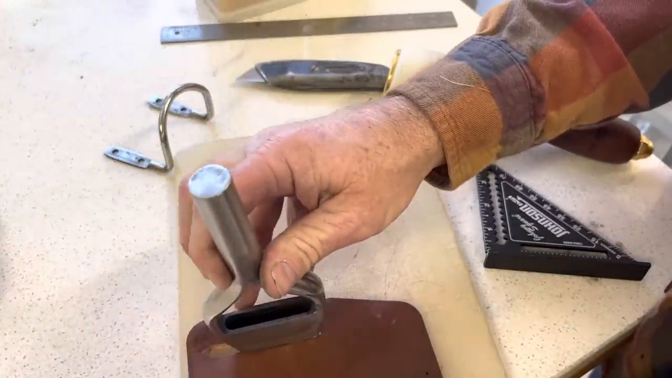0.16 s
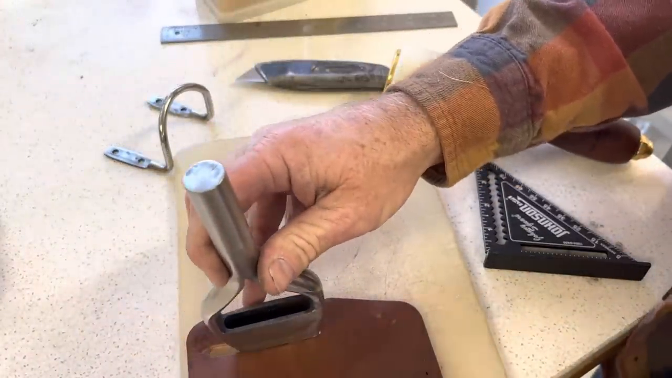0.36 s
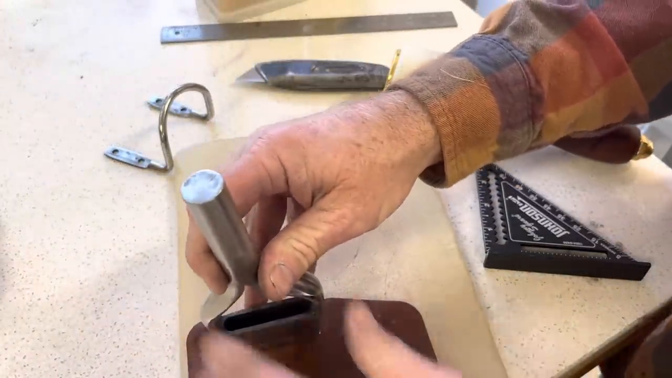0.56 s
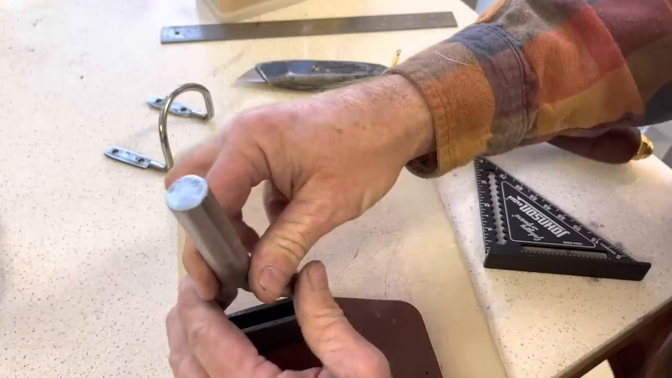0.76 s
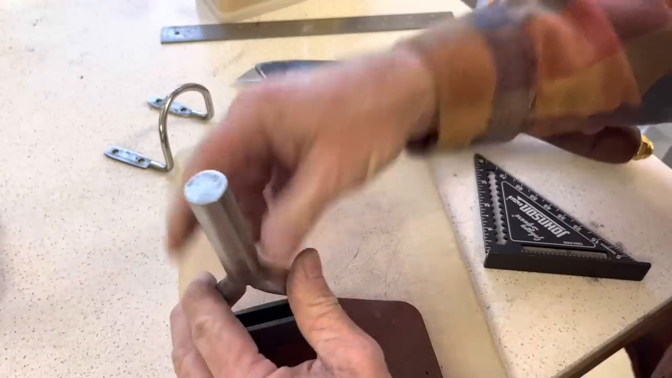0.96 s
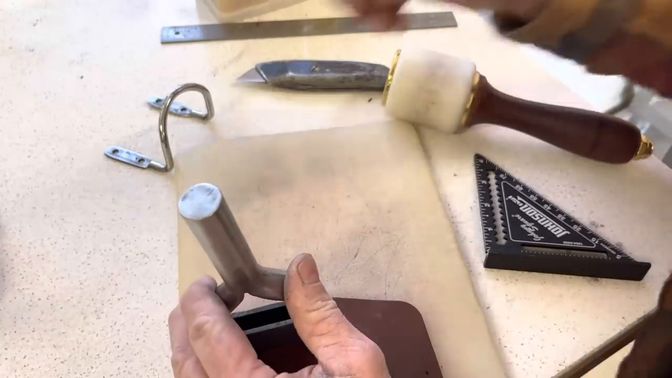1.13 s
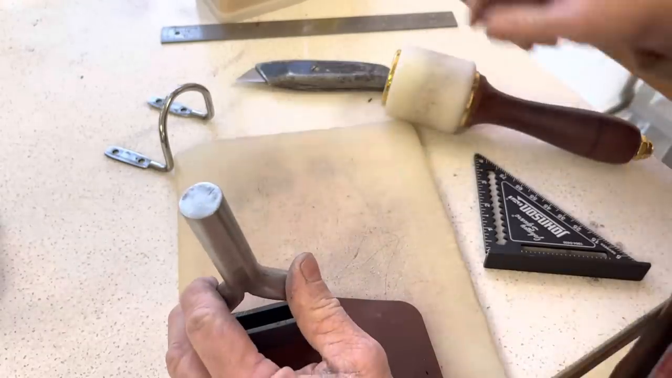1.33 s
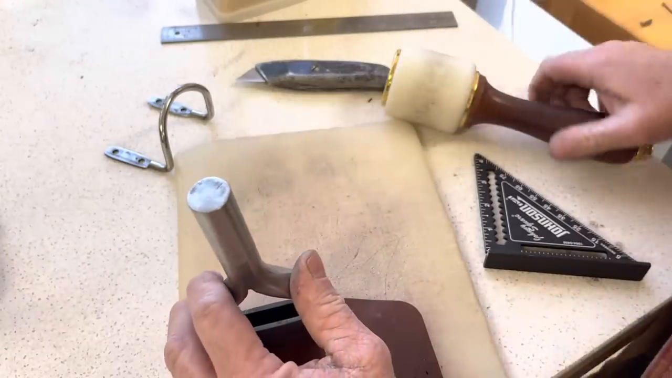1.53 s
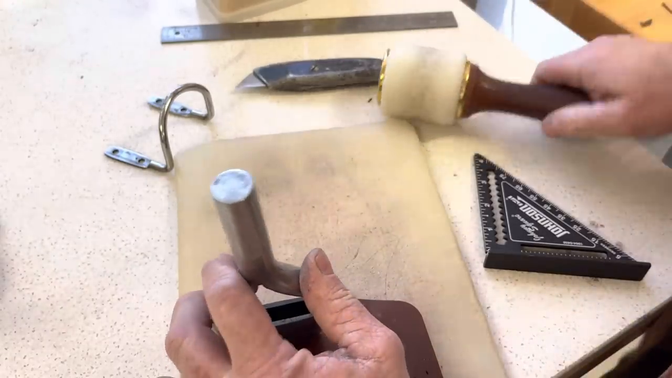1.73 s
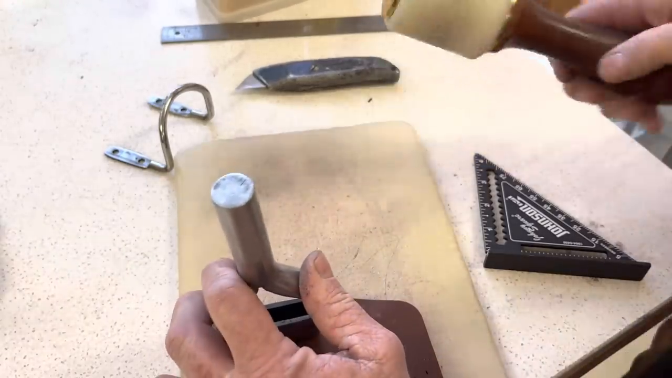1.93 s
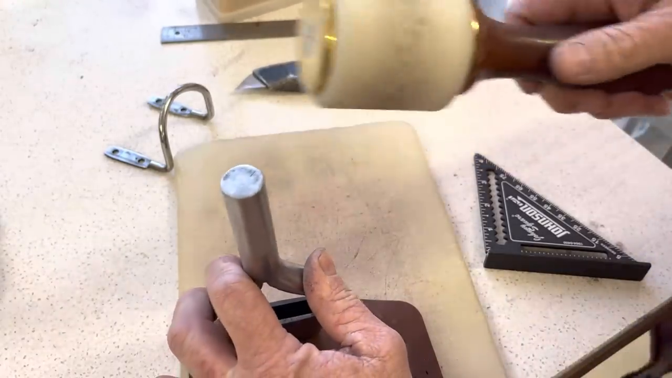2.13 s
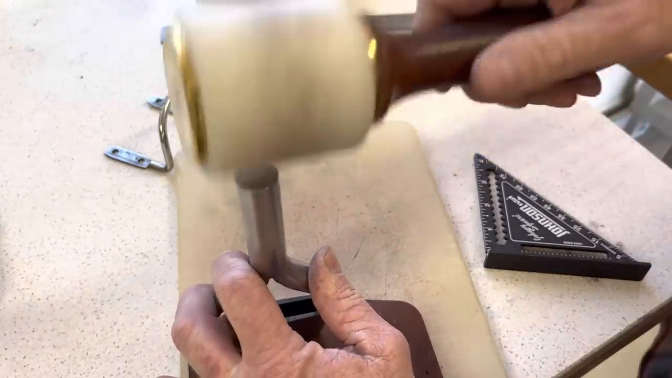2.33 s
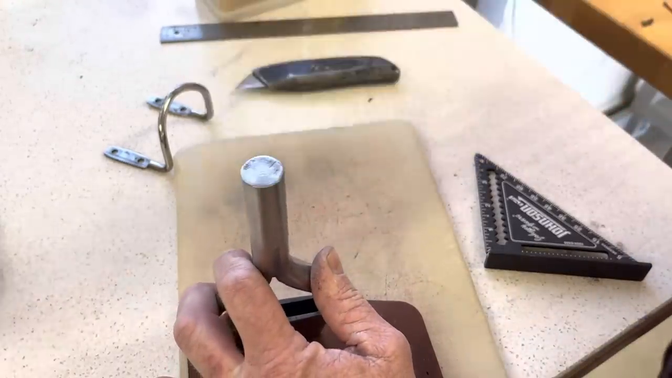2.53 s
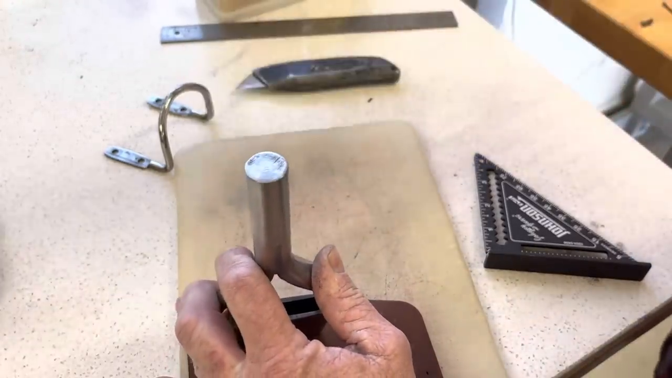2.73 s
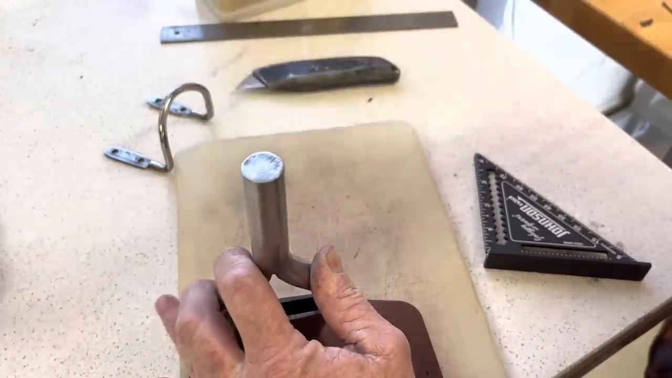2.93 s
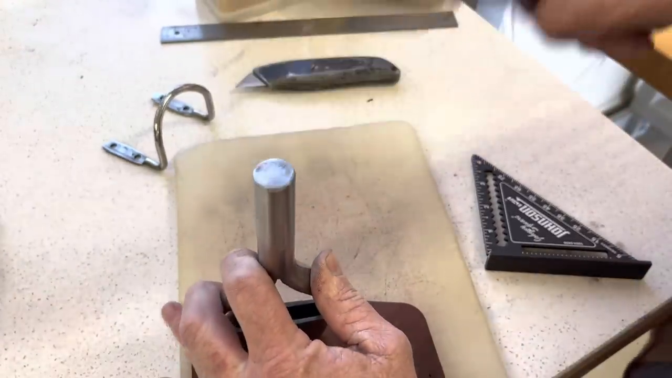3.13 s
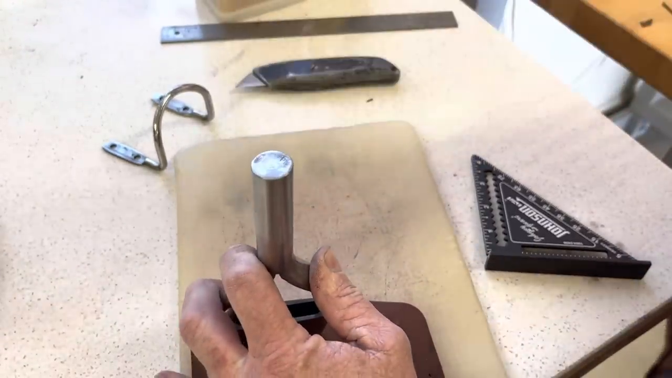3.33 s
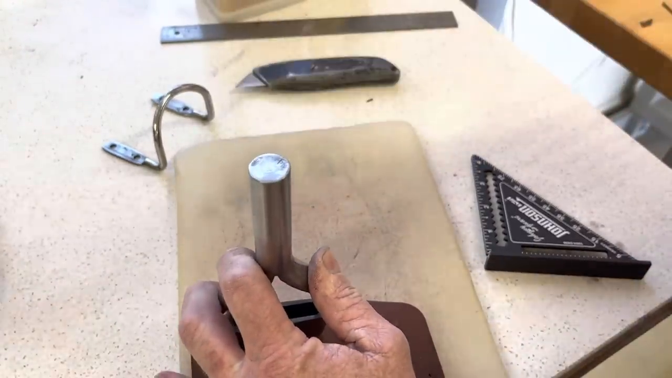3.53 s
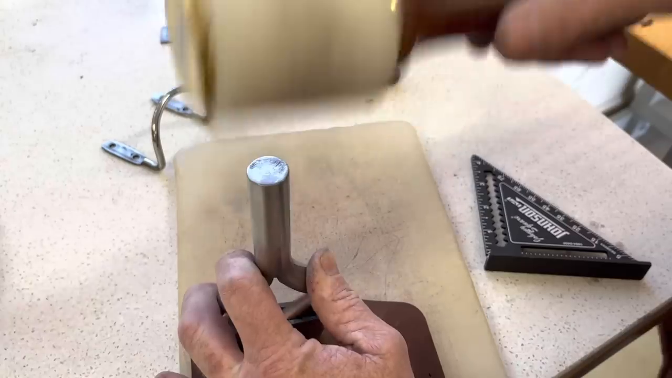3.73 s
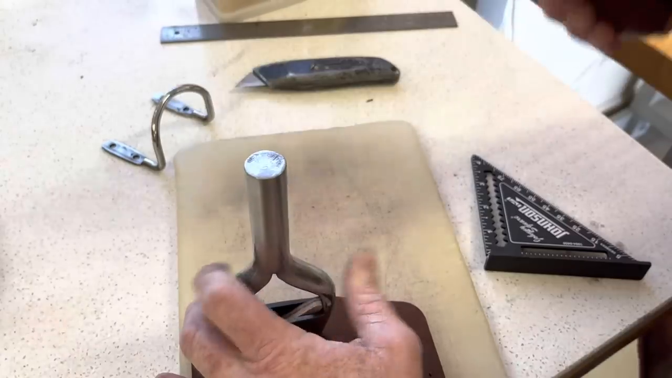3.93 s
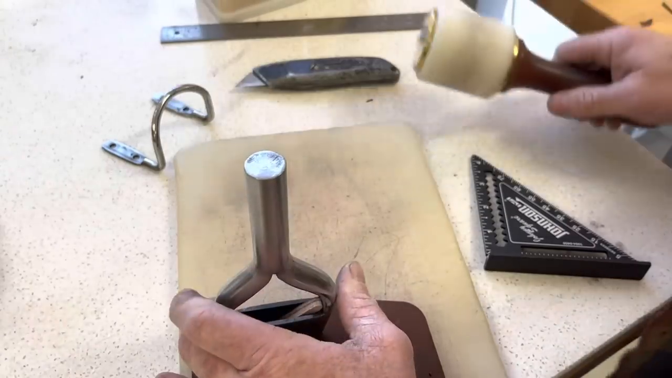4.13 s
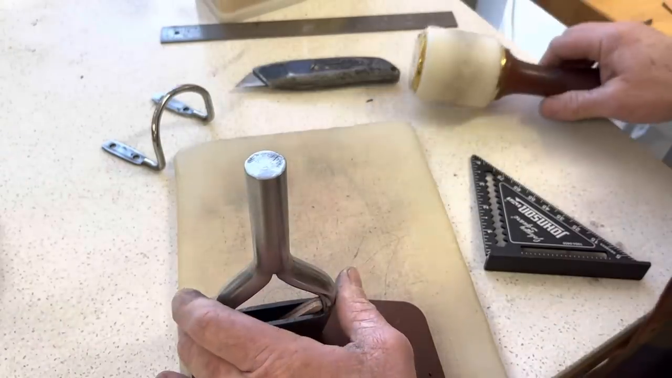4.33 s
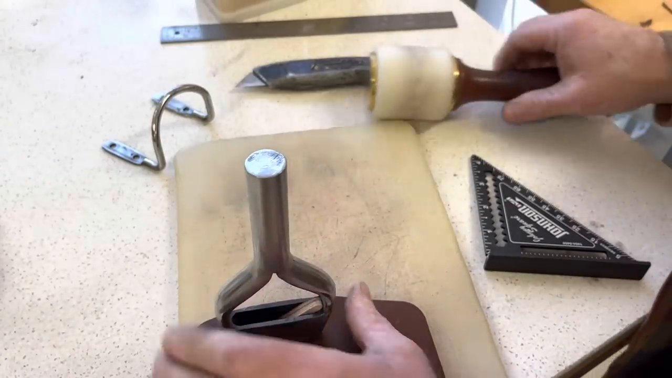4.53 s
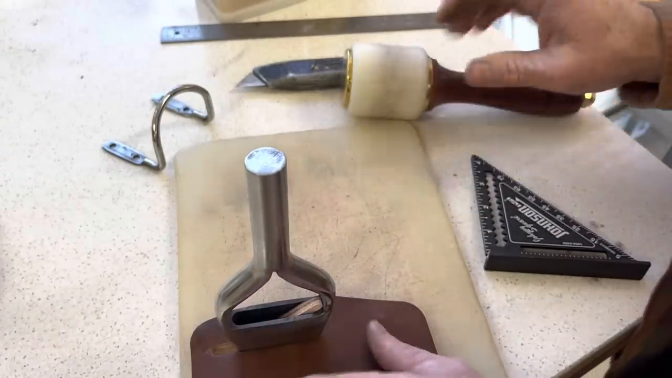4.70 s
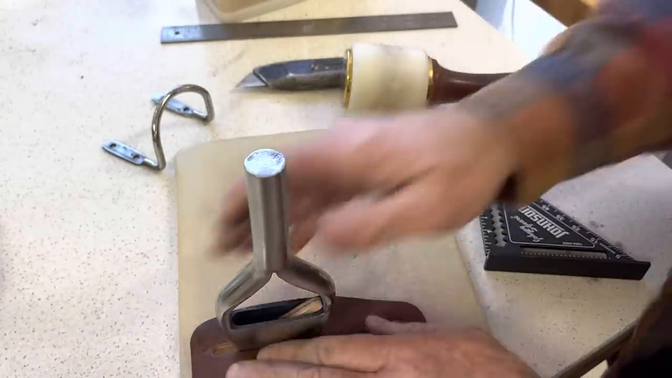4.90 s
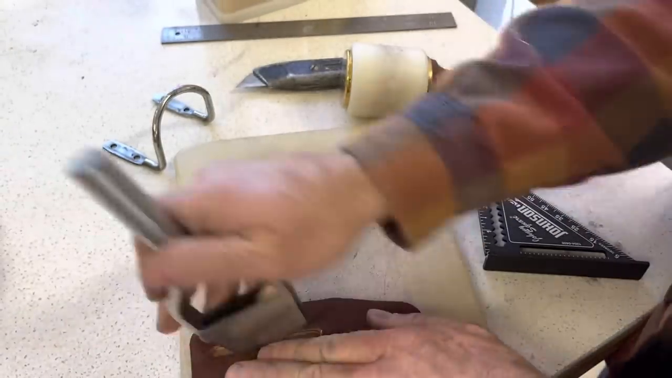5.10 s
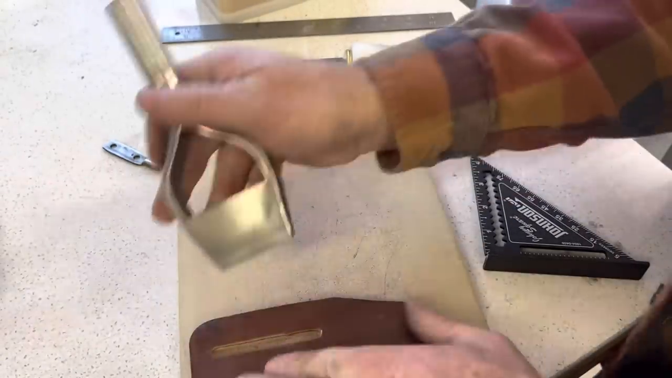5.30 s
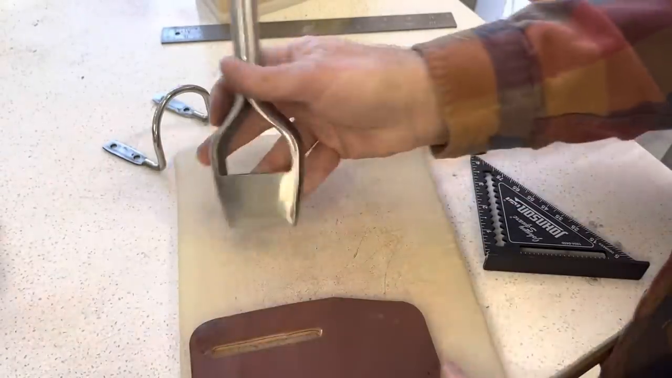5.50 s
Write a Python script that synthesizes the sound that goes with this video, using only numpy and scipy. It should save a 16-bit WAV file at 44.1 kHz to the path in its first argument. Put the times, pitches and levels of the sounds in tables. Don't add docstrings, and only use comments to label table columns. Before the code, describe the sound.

Close stereo pickup at a leather workbench. Faint low hum, sleeve rustle and small wooden knocks as a mallet is picked up. One firm tap on a steel punch, then two very loud, distorted blows about two thirds of a second apart, with bench thud, rattling steel and short room echo. The recorder ducks; the mallet is laid down with light knocks, then cloth rustles.

```python
import sys
import numpy as np
from scipy import signal
from scipy.fft import irfft, next_fast_len
from scipy.io import wavfile

SR = 44100
rng = np.random.default_rng(int(sys.argv[2]) if len(sys.argv) > 2 else 0)


def materialize(psi):
    bounded = np.clip(np.atleast_2d(psi).T, -1, 1)
    quanta = np.round(bounded * 32767).astype(np.int16)
    wavfile.write(sys.argv[1], SR, quanta)


def invert_db(x):
    u = np.asarray(x, float) / 20
    return 10 ** u


N = 245195


def unit(x):
    return x / np.sqrt(np.mean(x ** 2) + 1e-20)


def at_hz(points, hz):
    table_hz, value = np.transpose(points)
    return np.interp(np.log(hz), np.log(table_hz), value)


def band(x, low_hz, high_hz, order=2):
    return signal.sosfilt(signal.butter(order, [low_hz, high_hz], "band", fs=SR, output="sos"), x)


def ring(clicks, hz, t60):
    r, w = invert_db(-60 / (t60 * SR)), 2 * np.pi * hz / SR
    return signal.lfilter([0, np.sin(w)], [1, -2 * r * np.cos(w), r * r], clicks + 1e-18)


def add(out, sound, s):
    i = round(s * SR)
    out[:, i:i + sound.shape[1]] += sound[:, :N - i]


def swell(s, level_db, rise_s, t60):
    out, i = np.zeros(N), round(s * SR)
    t = np.arange(min(N - i, int((rise_s + 2 * t60) * SR))) / SR
    fall_db = 60 * np.maximum(t - rise_s, 0) / t60
    out[i:i + len(t)] = np.minimum(t / rise_s, 1) * invert_db(level_db - fall_db)
    return out


def together(envelopes):
    return np.sqrt(sum(e ** 2 for e in envelopes))


# f/Hz, likeness [-1 to 1]
LIKENESS = [(60, 1), (130, 0.92), (290, 0.97), (640, -0.18), (1410, -0.12), (3100, 0.59), (6820, -0.5),
            (15000, 1)]


def coloured(spectrum, from_hz, to_hz):
    size = next_fast_len(N)
    hz = np.maximum(np.arange(size // 2 + 1) * SR / size, 1)
    white = rng.standard_normal((2, len(hz))) + 1j * rng.standard_normal((2, len(hz)))
    mid, side = white * invert_db(at_hz(spectrum, hz))
    alike = np.clip(at_hz(LIKENESS, hz), -1, 1)
    both = np.sqrt(1 + alike) * mid + np.sqrt(1 - alike) * side * [[1], [-1]]
    inside = (hz > from_hz) & (hz < to_hz)
    power = np.sum(abs(both.mean(axis=0)[inside]) ** 2) * 2 / size ** 2
    return irfft(both, size)[:, :N] / np.sqrt(power)


# t/s, level/dB
GAIN = [(0.0, -0.5), (2.3, 0), (2.42, 4), (2.953, 0.5), (2.962, -24), (3.14, -19), (3.33, 1), (3.615, 2),
        (3.625, -20), (4.15, -20), (4.4, -17.5), (5.56, -18.5)]


def gain_control():
    return invert_db(np.interp(np.arange(N) / SR, *np.transpose(GAIN)))


# f/Hz, level/dB per Hz
AIR = [(15, -33.5), (25, -19), (55, -2), (87, -2.5), (166, -6), (195, -11), (236, -7.5), (354, -8.5),
       (863, -22.5), (1890, -28.5), (4490, -51.5), (6740, -52.5), (8140, -69), (11600, -50), (16000, -79.5)]
# t/s, level/dB, rise/s, t60/s, drone over air/dB
RUMBLE = [
    (2.36, -43, 0.05, 1.5, -17),
    (3.38, -54.5, 0.12, 0.97, 10),
    (3.63, -50, 0.2, 0.35, 4),
    (4.15, -75, 0.33, 1.1, 15),
]


def hum():
    steady = invert_db(-51.5) * gain_control()
    air = together([steady] + [swell(*row[:4]) for row in RUMBLE])
    low = [swell(s, db + drone_db, rise, t60) for s, db, rise, t60, drone_db in RUMBLE]
    low = together([steady] + low)
    drone = unit(ring(rng.standard_normal(N), 57, 0.86))
    return air * invert_db(-4.0) * coloured(AIR, 40, 300) + low * invert_db(-4.5) * drone


# t/s, level/dB, rise/s, t60/s, lower treble over upper/dB
RUSTLE = [(0.0, -83, 0.0049, 1.9, 12), (0.4, -75, 0.11, 4.8, 5), (0.62, -69, 0.055, 0.25, 6),
          (0.761, -89, 0.044, 0.55, -16), (0.9, -101, 0.013, 0.12, -13.5), (0.94, -90, 0.011, 2.3, 7),
          (1.39, -89, 0.04, 0.27, 30), (1.47, -77.5, 0.028, 3.1, 5), (1.83, -76, 0.018, 2.7, 2),
          (1.88, -66, 0.14, 0.047, 0.5), (2.25, -87, 0.023, 0.51, 9), (2.611, -62, 0.006, 0.019, -18),
          (2.62, -77, 0.004, 0.73, 5.5), (2.814, -81.5, 0.028, 1.8, 4), (4.7, -76, 0.16, 1.5, 12),
          (4.96, -59, 0.037, 0.41, 4.5), (5.1, -69.5, 0.024, 0.3, 4), (5.18, -67, 0.049, 1.9, 0)]


def rustle():
    cloth_db, cloth_lower_db = -96, 15
    upper = together([invert_db(cloth_db)] + [swell(*row[:4]) for row in RUSTLE])
    lower = [swell(s, db + lower_db, rise, t60) for s, db, rise, t60, lower_db in RUSTLE]
    lower = together([invert_db(cloth_db + cloth_lower_db)] + lower)
    white = rng.standard_normal((3, N))
    white = 0.27 * white[0] + 1.7 * white[1:]
    upper_hiss = unit(band(white, 9200, 13500, order=4))
    lower_hiss = unit(band(white, 1600, 5300))
    return gain_control() * (upper * upper_hiss + lower * invert_db(-1.0) * lower_hiss)


def tail(gain, treble_gain, colour, level_range_hz, lines=()):
    noise = coloured(colour, *level_range_hz)
    body = signal.sosfilt(signal.butter(2, 2300, fs=SR, output="sos"), noise)
    treble = unit(band(noise, 2300, 11000, order=3))
    for hz, level_db in lines:
        treble += invert_db(level_db + 9) * unit(ring(noise[0], hz, 0.25))
    return gain * body + invert_db(3.0) * treble_gain * treble


# t/s, level/dB, treble/dB, slow part/dB
WOOD_TAIL = [(1.215, -62.5, 4, -12.5), (1.633, -54.5, -2.5, -5.5), (1.655, -44.5, -9.5, -20),
             (1.681, -38.5, -16, -31), (1.709, -27, -42, -14.5), (2.353, -21.5, -18, -14),
             (2.371, -22, -31, -28), (4.358, -38, -14.5, -18.5), (4.422, -47, -37, -8.5),
             (4.484, -49, -34, -10), (4.608, -41, -25, -14), (4.658, -55.5, -36, -10.5)]
# f/Hz, level/dB per Hz
WOOD_COLOUR = [(35, -34.5), (60, -1.5), (106, -1.5), (156, -8.5), (460, -3), (552, -14), (664, -7),
               (1080, -22), (1270, -25), (5300, -48), (7800, -57.5), (10100, -84), (17200, -120)]


def wood_tail():
    rise_s, quick_t60_s, slow_t60_s, slow_treble_db = 0.001, 0.1, 0.72, 3.5
    body, treble = [], []
    for s, db, treble_db, slow_db in WOOD_TAIL:
        quick = swell(s, db, rise_s, quick_t60_s)
        slow = swell(s, db + slow_db, rise_s, slow_t60_s)
        body += [quick, slow]
        treble += [invert_db(treble_db) * quick, invert_db(treble_db + slow_treble_db) * slow]
    return tail(together(body), together(treble), WOOD_COLOUR, (250, 1000))


# t/s, level/dB, treble/dB
ECHO = [
    (2.345, -46.5, -13),
    (2.962, -14.5, 1.5),
    (3.624, -15, -1.5),
]
# t/s, level/dB, treble/dB
REBOUNDS = [
    (2.341, -25.5, -31.5),
    (2.363, -33.5, -27.5),
    (3.027, -12.5, -1.5),
    (3.705, -9.5, -2),
]
# f/Hz, level/dB per Hz
ECHO_COLOUR = [(35, -34), (60, -7.5), (208, -4), (509, 2), (1170, 1), (2540, -9), (3250, -16.5),
               (3520, -15), (5520, -17.5), (6490, -22.5), (7800, -40), (10100, -75), (17200, -120)]
# f/Hz, level/dB
ECHO_LINES = [(1040, -22.5), (1660, -27.5), (3273, -23), (4010, -33.5), (4560, -26), (5090, -30.5),
              (5630, -28.5), (6335, -32)]


def echo():
    room_rise_s, room_t60_s, room_treble_t60_s = 0.012, 0.75, 0.68
    rebound_rise_s, rebound_t60_s = 0.0035, 0.066
    body, treble = [], []
    for s, db, treble_db in ECHO:
        body.append(swell(s, db, room_rise_s, room_t60_s))
        treble.append(swell(s, db + treble_db, room_rise_s, room_treble_t60_s))
    for s, db, treble_db in REBOUNDS:
        burst = swell(s, db, rebound_rise_s, rebound_t60_s)
        body.append(burst)
        treble.append(burst * invert_db(treble_db))
    return gain_control() * tail(together(body), together(treble), ECHO_COLOUR, (900, 2000), ECHO_LINES)


# t/s, peak level/dB, f/Hz
TICKS = [(0.921, -53.5, 2150), (1.2138, -43, 2080), (1.408, -59, 2560), (1.6395, -47.5, 4000),
         (2.616, -71, 3200), (4.95, -55.5, 2100), (4.999, -62, 3250), (5.1191, -68, 4500)]


def ticks():
    out, t = np.zeros((2, N)), np.arange(SR // 8) / SR
    for s, peak_db, hz in TICKS:
        grains = rng.standard_normal((2, len(t))) * (0.43 + 3.4 * (rng.random(len(t)) < 0.04))
        grains *= invert_db(-60 * t / 0.14)
        add(out, invert_db(peak_db - 3.5) * (band(grains, 760, 6700) + invert_db(-22.5) * ring(grains, hz, 0.013)), s)
    return out


# t/s, peak level/dB, slap f/Hz, board f/Hz, board level/dB
KNOCKS = [(1.221, -57.5, 2150, 800, 6), (1.682, -44, 513, 292, 10), (1.6912, -33.5, 2200, 503, -3),
          (1.7023, -22, 986, 410, 8), (2.3350, -8.5, 1045, 353, 5), (2.367, -31.5, 905, 330, 15),
          (3.006, -22, 1980, 485, -17.5), (3.027, -33, 1670, 500, -31), (3.7067, -19, 1900, 960, -2),
          (3.835, -40.5, 277, 121, 0), (4.3519, -32.5, 887, 318, -4), (4.417, -34.5, 918, 390, -5),
          (4.445, -59, 800, 398, -14), (4.477, -45, 787, 390, 9), (4.489, -53, 682, 330, 13),
          (4.603, -36.5, 830, 501, 3), (4.613, -42, 903, 400, -17), (4.656, -47.5, 596, 280, 8),
          (4.958, -60, 2007, 595, -22), (5.002, -57, 1205, 249.3, 0.5), (5.549, -61, 998, 501, -5)]
# f/Hz, level/dB, t60/s
BENCH = [(103.7, -17, 0.083), (150.6, -14.5, 0.21), (214, -17.5, 0.36), (275, -7.5, 0.045),
         (353, -10.5, 0.27), (469, -19, 0.033), (621.4, -7, 0.061), (714, -11.5, 0.19), (910, -12.5, 0.17),
         (998, -14, 0.21), (1317, -15, 0.06), (1665, -2.5, 0.055), (2183, -12.5, 0.05)]


def knocks():
    out, t = np.zeros((2, N)), np.arange(SR // 6) / SR
    tap_s = KNOCKS[4][0]
    for s, peak_db, slap_hz, board_hz, board_db in KNOCKS:
        bench = np.zeros((2, len(t)))
        for (hz, level_db, t60), luck in zip(BENCH, rng.standard_normal((len(BENCH), 2))):
            late = np.maximum(t - 1.2 / hz, 0)
            size = invert_db(level_db + 1.3 * luck[0] - 60 * late / t60) / (1 + (hz / slap_hz) ** 4)
            balance = invert_db(3.6 * luck[1] * np.array([[1], [-1]]))
            bench += balance * size * np.sin(2 * np.pi * hz * late)
        slap = np.sin(2 * np.pi * slap_hz * t) * np.sin(np.pi * np.minimum(t * slap_hz / 3.0, 1))
        swings = (t - 0.0035) * board_hz
        board = np.sin(2 * np.pi * swings) * np.sin(np.pi * np.clip(swings / 2.4, 0, 1)) ** 0.52
        puff_db = -16 + 3 * np.log2(slap_hz / 1000) + 15 * (s == tap_s)
        puff = band(rng.standard_normal((2, len(t))), 500, min(3 * slap_hz, 7000)) * invert_db(-60 * t / 0.096)
        knock = 0.5 * bench + 0.95 * slap + 0.81 * invert_db(board_db) * board + invert_db(puff_db) * puff
        add(out, invert_db(peak_db) * knock, s)
    return out


def jolt(s, drive_db, rise_s, t60, lasts_s):
    over = np.maximum(np.arange(N) / SR - s - lasts_s, 0)
    settle_t60_s = 0.04
    return swell(s, drive_db, rise_s, t60) * invert_db(-60 * np.minimum(over, 1) / settle_t60_s)


PORT_LAG = 7
# t/s, drive level/dB, rise/s, t60/s, lasts/s
RATTLE = [(2.339, -31, 0.0053, 0.048, 0.06), (2.37, -63.5, 0.011, 0.45, 0.099),
          (2.964, -34.5, 0.015, 0.79, 0.093), (3.021, -24.5, 0.0094, 0.28, 0.11),
          (3.627, -38, 0.0087, 0.64, 0.081), (3.64, -26, 0.061, 0.16, 0.13),
          (4.352, -42, 0.014, 0.16, 0.04), (4.419, -60.5, 0.006, 0.099, 0.026),
          (4.393, -76, 0.012, 0.81, 0.22), (4.601, -52.5, 0.011, 0.4, 0.033),
          (4.633, -78, 0.012, 0.6, 0.14)]
STEEL_HZ = [3274, 4010, 5090, 6335, 6650, 9800, 10035, 10800, 11238, 11850, 12410, 13033, 13182, 13490,
            14830, 15100, 9400, 2110, 5660]
STEEL_DB = [0, -5, -16.5, -4, -3.5, -6, -4, 1, -0.5, -4, -8.5, 1.5, -6, -1.5, -8.5, -6]


def rattle():
    drive = together(jolt(*row) for row in RATTLE)
    heights = invert_db(4.0 * np.minimum(rng.exponential(1, N), 4))
    sizes = unit(heights * rng.choice([-1, 1], N))
    dealt = rng.integers(0, 120, N)
    out = np.zeros((2, N))
    lucks = rng.standard_normal(len(STEEL_HZ))
    for k, (hz, level_db, luck) in enumerate(zip(STEEL_HZ, STEEL_DB, lucks)):
        strikes = invert_db(-14.0) * drive * sizes * (dealt == k)
        out += invert_db(level_db + 3.0 * luck * np.array([[1], [-1]])) * ring(strikes, hz, 0.05)
    white = rng.standard_normal((3, N))
    contacts = white[0] + 0.3 * sizes
    white = 0.4 * white[1:] + [np.roll(contacts, PORT_LAG), contacts]
    hiss = unit(band(white, 9600, 13600, order=3)) + invert_db(-4.5) * unit(band(white, 3300, 5600))
    return out + invert_db(-8) * drive * hiss


# t/s, level/dB, f/Hz
CLINKS = [(1.222, -48.5, 2110), (1.452, -57, 2110), (2.967, -44.5, 14830), (2.971, -37.5, 3274),
          (3.03, -53, 11850), (3.02, -30.5, 9800), (3.028, -28.5, 10800), (3.028, -24.5, 11238),
          (3.029, -26, 13033), (3.031, -30, 14830), (3.034, -27.5, 3274), (3.04, -32.5, 10035),
          (3.064, -32, 12410), (3.633, -29.5, 10800), (3.66, -36.5, 3274), (3.642, -35.5, 10035),
          (3.668, -42.5, 14830), (3.657, -31.5, 13490), (3.645, -41.5, 6650), (3.681, -31, 11238),
          (3.682, -28.5, 10800), (3.69, -29, 12410), (3.72, -66, 11850), (4.363, -53, 11238),
          (4.364, -52, 13033), (4.36, -44, 9400), (4.366, -65.5, 3274), (4.365, -64, 5660),
          (4.612, -69.5, 3274), (4.616, -71, 4010)]
STEEL_T60_S = [0.28, 0.35, 0.3, 0.2, 0.25, 0.8, 0.33, 0.09, 0.09, 0.8, 0.09, 0.07, 0.11, 0.14, 0.25, 0.2,
               0.2, 0.075, 0.45]


def clinks():
    laid_down_s, laid_down_damping = 4.2, 0.58
    out, t = np.zeros((2, N)), np.arange(SR * 3 // 5) / SR
    for (s, level_db, near_hz), luck in zip(CLINKS, rng.standard_normal((len(CLINKS), 64))):
        hz, t60 = min(zip(STEEL_HZ, STEEL_T60_S), key=lambda mode: abs(mode[0] - near_hz))
        if s > laid_down_s:
            t60 *= laid_down_damping
        lag = np.array([[0], [2 * np.pi * hz * PORT_LAG / SR * (hz > 6000) + 0.4 * luck[3]]])
        twin = 0.18 * np.sin(2 * np.pi * (hz + 30 * luck[0]) * t + luck[1] + lag)
        pair = np.sin(2 * np.pi * hz * t + lag) + twin
        flutter_db = 3.5 * np.interp(t * 95, np.arange(60), luck[4:])
        fade = np.minimum(t / 0.0011, 1) * np.maximum(1 - t / 1.0, 0) ** 0.5
        add(out, invert_db(level_db + flutter_db - 60 * t / t60) * fade * pair, s)
    return out


# t/s, level/dB
FAINT_SWELLS = [
    (2.336, -51),
    (4.3563, -53),
    (4.605, -64),
]


def faint_swells():
    out, ahead = np.zeros((2, N)), np.arange(-800, 0) / SR
    for s, level_db in FAINT_SWELLS:
        growth = (1 + ahead * SR / 800) ** 0.65
        tone = growth * np.sin(2 * np.pi * 1652 * ahead) * [[0.1], [1.5]]
        add(out, invert_db(level_db) * tone, s - 800 / SR)
    return out


# t/s, crack level/dB, level of the swell ahead/dB, growth of the swell/dB per ms
BLOWS = [
    (2.955, -4, -8.5, 1.8),
    (3.6170, -7.5, -9, 3),
]
# lurch height [full scale], lurch delay/s, sway level/dB
LURCHES = [
    (-0.13, 0.0066, -44),
    (0.17, 0.015, -28.5),
]
# f/Hz, level/dB
SWELL_TONES = [
    [(446, -4), (837.3, -3), (1051, -3.5), (1512, -18), (1651, 1.5), (2820, -23), (2624, -26.5),
     (5040, -22), (5560, -23), (6800, -24.5)],
    [(400, -13.5), (990, -17.5), (1325, -16.5), (1651, 1), (1682.4, 2), (2300, -22.5), (3200, -24),
     (4500, -20), (4750, -29), (5530, -32), (7560, -29.5)],
]


def swell_ahead(before, growth, tones):
    grown = invert_db(-growth * 1000 * before)
    noise = unit(band(rng.standard_normal((2, len(before))), 150, 1500))
    ahead = invert_db(2.5) * (grown + 0.04) * noise * [[0.7], [1.1]]
    ahead[0] = band(ahead[0], 100, 1100)
    for (hz, level_db), phase in zip(tones, rng.uniform(0, 2 * np.pi, (len(tones), 2))):
        left = 0.9 if hz < 1000 else 0.12 if hz < 5000 else 0.7
        steady = 0.3 if hz > 2000 else 0.12 if hz > 1500 else 0.02
        tone = np.sin(2 * np.pi * hz * before + phase[:, None])
        ahead += invert_db(level_db) * (grown + steady) * tone * [[left], [1.6]]
    return ahead


def blows():
    recoil_start_hz, recoil_end_hz, recoil_fall_s = 1950, 235, 0.0007
    out, t = np.zeros((2, N)), np.arange(SR // 2) / SR
    before = t[:1764][::-1]
    for blow, (height, delay_s, sway_db), tones in zip(BLOWS, LURCHES, SWELL_TONES):
        s, crack_db, swell_db, growth = blow
        start = invert_db(swell_db) * np.clip((0.034 - before) / 0.015, 0, 1) ** 2
        add(out, swell_ahead(before, growth, tones) * start, s - 0.04)
        snap = (1 - t / 0.00022) * (t < 0.00044) * [[1.6], [0.8]]
        spray = band(rng.standard_normal((2, len(t))), 1100, 0.35 * SR)
        spray = spray * (invert_db(-60 * t / 0.004) + invert_db(-25 - 60 * t / 0.029))
        fall = recoil_fall_s * (1 - np.exp(-t / recoil_fall_s))
        turns = recoil_end_hz * t + (recoil_start_hz - recoil_end_hz) * fall
        recoil = 0.19 * np.sin(2 * np.pi * turns) * invert_db(-60 * t / 0.038) * (t < 0.02)
        late = np.maximum(t - delay_s, 0) / 0.0052
        lurch = height * late ** 3.9 * np.exp(2.7 * (1 - late))
        sway = invert_db(sway_db - 60 * (t / 0.59) ** 2) * (t < 0.44) * np.minimum(t / 0.18, 1)
        sway = sway * np.sin(2 * np.pi * 48 * t)
        boom = invert_db(-20.5 - 60 * t / 0.12) * np.sin(2 * np.pi * 115 * t)
        add(out, invert_db(crack_db) * (snap + spray) + recoil + lurch + sway + boom, s)
    return out


def scene():
    workshop = hum() + rustle() + wood_tail() + echo()
    bench = ticks() + knocks() + rattle() + clinks()
    return workshop + bench + faint_swells() + blows()


def band_limit(x):
    return signal.sosfilt(signal.butter(12, 16670, fs=SR, output="sos"), x)


def record(dry):
    x = signal.sosfilt(signal.butter(3, [7500, 9100], "bandstop", fs=SR, output="sos"), dry)
    x = signal.sosfilt(signal.butter(1, 7.0, "high", fs=SR, output="sos"), x)
    x = signal.sosfilt(signal.cheby2(10, 60, 16300, fs=SR, output="sos"), x)
    return band_limit(np.tanh(x))


dry = scene()
out = record(dry)
materialize(out)
```